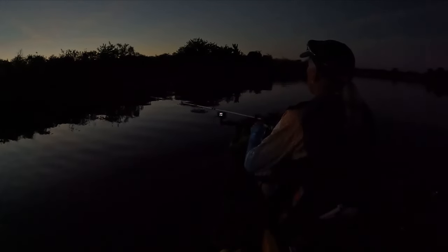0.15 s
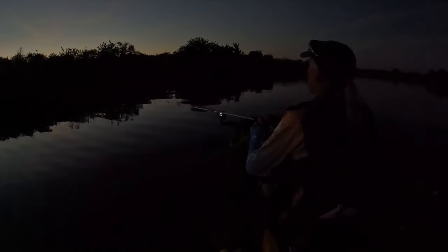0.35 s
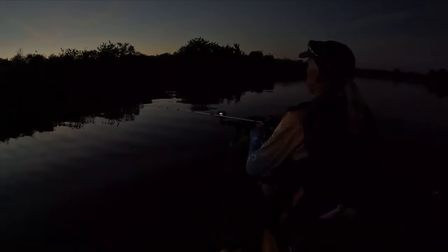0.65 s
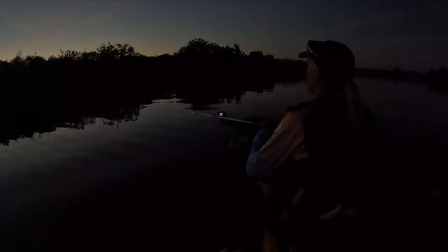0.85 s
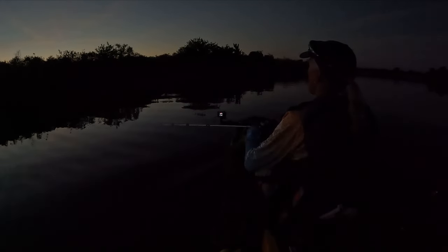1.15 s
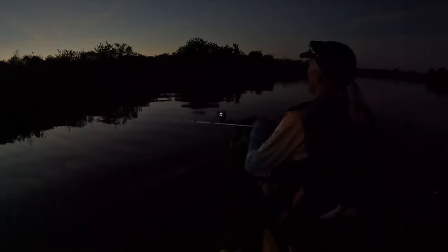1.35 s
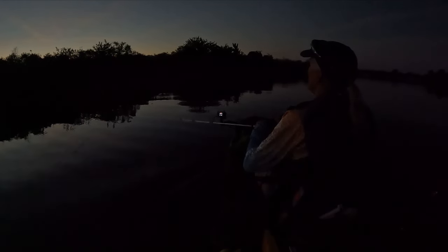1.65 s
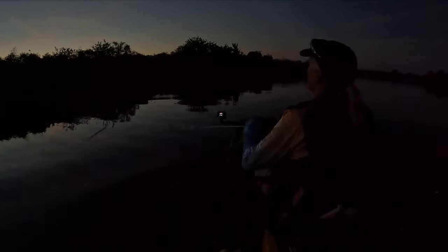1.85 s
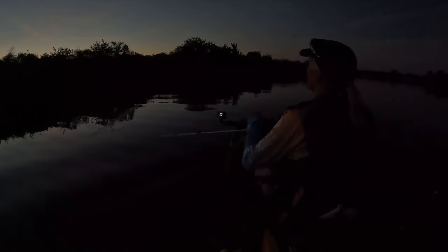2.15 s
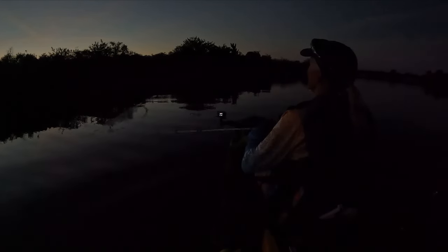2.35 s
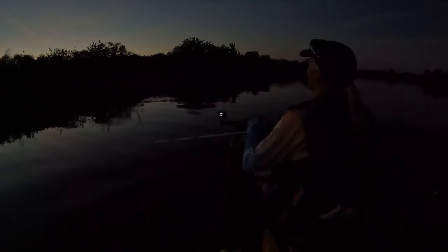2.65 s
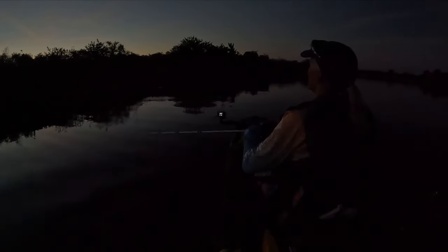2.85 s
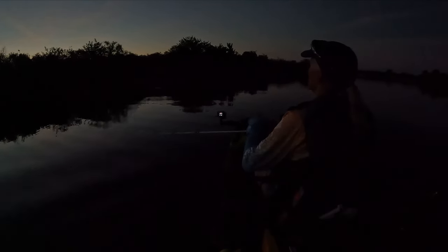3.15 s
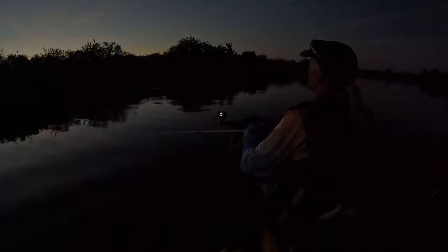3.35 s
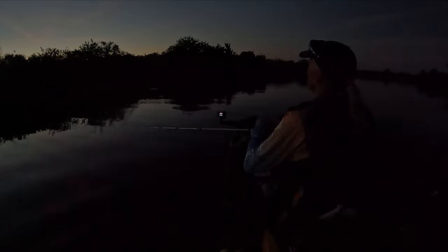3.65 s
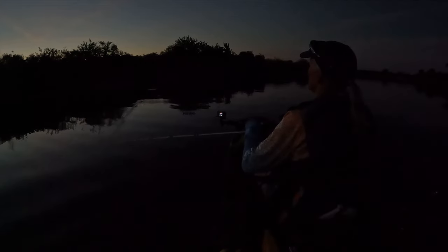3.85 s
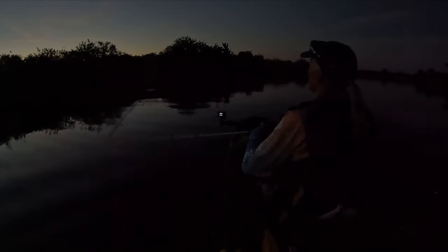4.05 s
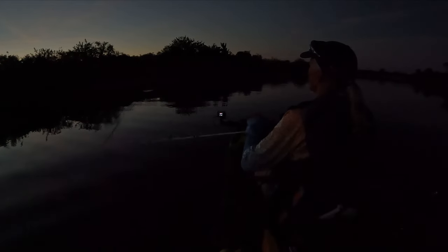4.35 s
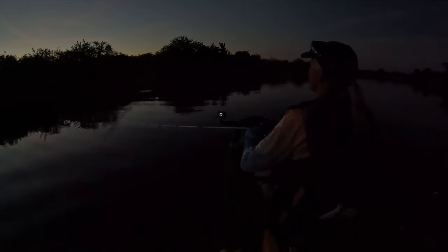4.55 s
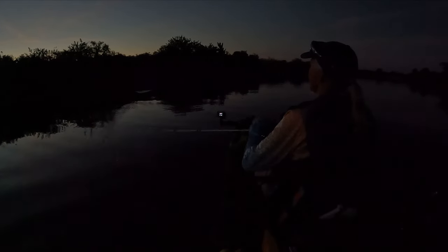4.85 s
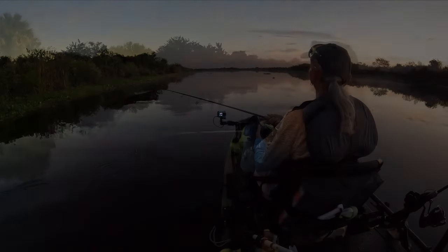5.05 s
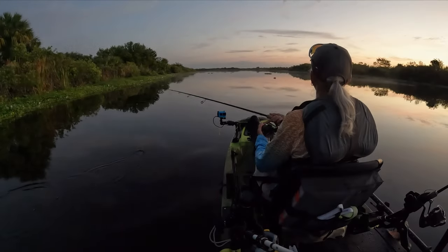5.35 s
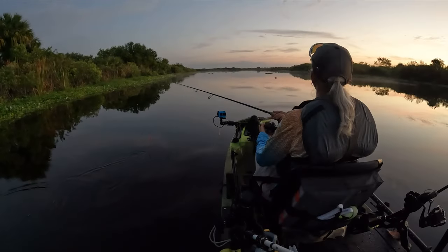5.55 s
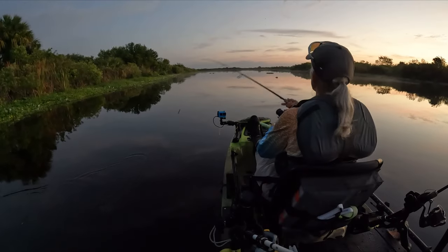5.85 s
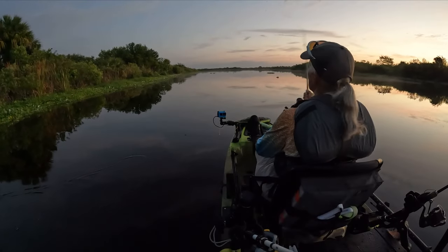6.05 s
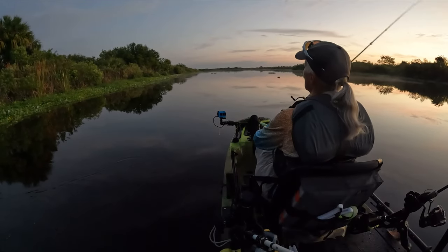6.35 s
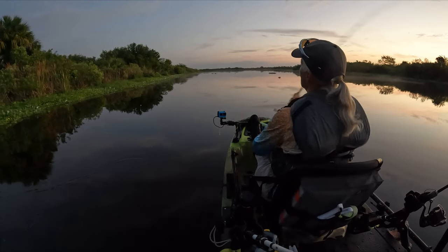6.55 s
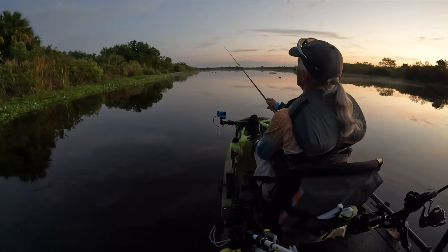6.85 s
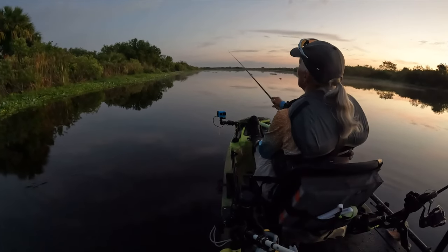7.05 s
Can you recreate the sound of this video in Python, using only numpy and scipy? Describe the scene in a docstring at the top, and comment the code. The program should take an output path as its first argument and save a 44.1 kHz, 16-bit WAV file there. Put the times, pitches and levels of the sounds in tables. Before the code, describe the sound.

A fishing reel rasps and ticks close by over quiet marsh birds, with gear knocking on a kayak, then a swishing cast.

```python
"""Casting from a kayak at dawn

Still marsh water: far birds and insects, a low hum, light wind on the microphone. Close by, an
angler cranks a reel that rasps and ticks, while tackle rattles and gear knocks on the plastic hull.
Near the end the bail snaps, the line is wound up, the rod swishes and line hisses off the spool.
Everything sits in the centre; only a faint hiss differs between left and right."""
import sys
import numpy as np
from scipy import signal
from scipy.fft import rfft, irfft
from scipy.io import wavfile
from scipy.ndimage import uniform_filter1d

SR = 44100
rng = np.random.default_rng(int(sys.argv[2]) if len(sys.argv) > 2 else 0)


def master_out(mix):
    """Clip the mix to full scale and print it as 16-bit PCM to the path in sys.argv[1]."""
    frames = np.transpose(np.atleast_2d(mix))
    ceiling = np.clip(frames, -1, 1)
    pcm = np.round(ceiling * 32767).astype(np.int16)
    wavfile.write(sys.argv[1], SR, pcm)


N = 317735
T = np.arange(N) / SR

# modes of the reel body: pitch_hz, width_hz, gain_db
REEL_MODES = [(850, 200, -2.5), (1563, 260, 21), (2183, 470, 9.5), (2920, 550, -35), (5330, 1040, -39),
              (9400, 1960, -18)]


def amp(db):
    """Decibels to amplitude."""
    return 10 ** (np.asarray(db) / 20)


def unit_rms(x):
    """Scales a signal to an RMS of 1."""
    return x / np.sqrt(np.mean(x ** 2) + 1e-20)


def add(mix, start_s, sound):
    """Mixes a sound in at its start time."""
    part = mix[round(start_s * SR):][:len(sound)]
    part += sound[:len(part)]


def follow(rows):
    """Columns of a timed curve at every sample, and a gate that closes within 10 ms outside it."""
    times, *columns = np.transpose(rows)
    gate = np.interp(T, [times[0] - .01, times[0], times[-1], times[-1] + .01], [0, 1, 1, 0])
    return [np.interp(T, times, column) for column in columns] + [gate]


def colour(x, points):
    """Shapes the spectrum along points of freq_hz, gain_db."""
    point_hz, db = np.transpose(points)
    hz = np.fft.rfftfreq(len(x), 1 / SR)
    gain = amp(np.interp(np.log(hz + 1), np.log(point_hz + 1), db))
    return irfft(rfft(x) * gain, len(x))


def flicker(per_s, db):
    """A factor that wanders at random around 1."""
    steps = np.arange(0, T[-1] + 1, 1 / per_s)
    return amp(db * np.interp(T, steps, rng.standard_normal(len(steps))))


def noise(points):
    """Noise of unit RMS, coloured along points of freq_hz, gain_db."""
    return unit_rms(colour(rng.standard_normal(N), points))


def resonate(x, hz, *widths_hz):
    """Resonances in series, one per width: each shifts hz down to zero, smooths and shifts back."""
    carrier = np.exp(2j * np.pi * np.cumsum(hz * np.ones(len(x))) / SR)
    for width in widths_hz:
        pole = np.exp(-np.pi * width / SR)
        x = 2 * (carrier * signal.lfilter([1 - pole], [1, -pole], x / carrier)).real
    return x


def noise_band(hz, *widths_hz):
    """Noise of unit RMS around a steady or moving pitch."""
    return unit_rms(resonate(rng.standard_normal(N), hz, *widths_hz))


def tone(hz):
    """A gliding sine of unit RMS."""
    return np.sqrt(2) * np.sin(2 * np.pi * np.cumsum(hz) / SR)


def marsh():
    """Still air over the water; far insect and bird choruses and a low hum as bands of noise."""
    # spectrum of the air: freq_hz, gain_db
    air_colour = [(60, -22), (100, 5.5), (130, -5.5), (200, -13.5), (450, -13.5), (700, -18.5), (1400, -14),
                  (2200, -11.5), (2800, -14.5), (3400, -19), (3900, -10.5), (5000, -15.5), (7000, -23),
                  (15000, -30), (16500, -27)]
    # choruses and hum: start_s, end_s, pitch_hz, width_hz, level_db
    drones = [(0, 8, 4200, 360, -69.5), (0.5, 9.5, 4240, 470, -70.5), (5.098, 6, 5600, 120, -75.5),
              (5.148, 8.1, 118, 30, -63), (2, 3.2, 314, 34, -76.5), (5.2, 9.4, 186, 32, -68),
              (1.3, 5.3, 2780, 940, -71)]
    out = amp(-62) * noise(air_colour) * flicker(3.75, 1)
    for start, end, hz, width, db in drones:
        fade = np.clip(np.minimum(T - start + .1, end - T) / .1, 0, 1)
        out += fade * amp(db) * noise_band(hz, width, width) * flicker(8, 1.6)
    return out


def side_hiss():
    """Faint steady hiss, opposite in left and right."""
    # spectrum of the hiss: freq_hz, gain_db
    hiss_colour = [(60, -12), (200, -3.5), (600, -1), (1200, -14), (3000, -19.5), (8000, -3), (12000, 0),
                   (16000, -8)]
    return amp(-83.5) * noise(hiss_colour) * flicker(25, 1.8)


def wind():
    """Light wind on the microphone: deep, lumpy gusts under a low rustle."""
    # strength of the breeze: time_s, gust_db, rustle_db
    breeze = [(0.0, -38, -48), (0.18, -42.5, -59), (0.5, -46, -53), (0.74, -45, -55.5), (0.96, -46, -65.5),
              (1.7, -47, -63), (2.55, -46, -64.5), (3.4, -50, -68), (4.9, -49.5, -66.5), (5.33, -55.5, -69),
              (5.5, -53, -62.5), (5.9, -53.5, -62.5), (6.05, -56, -68), (6.56, -49, -65.5),
              (6.62, -47, -34)]
    gust_db, rustle_db, gate = follow(breeze)
    gusts = noise([(2, 9.5), (12, 8.5), (45, 0), (70, -4), (130, -28), (400, -55)]) * flicker(9, 2.2)
    rustle = noise([(60, 2), (150, 2), (320, 1.5), (550, -6), (800, -15), (3000, -43)])
    return gate * (amp(gust_db) * gusts + amp(rustle_db) * rustle * flicker(30, 2.5))


def birds():
    """Gliding whistles, a little blurred by distance, with faint echoes from the far bank."""
    # bird notes: start_s, length_s, start_hz, end_hz, level_db
    notes = [(0.58, .03, 2350, 2300, -66), (0.685, .03, 750, 900, -65), (0.712, .045, 1050, 1200, -66),
             (0.77, .06, 760, 730, -58), (0.915, .022, 2300, 2400, -56), (1.045, .04, 2480, 2400, -67),
             (1.07, .04, 1300, 1350, -66), (1.21, .06, 740, 740, -65), (1.275, .07, 3440, 2840, -63),
             (1.36, .04, 2290, 2950, -67), (1.7, .055, 3380, 2780, -63), (2.15, .04, 3350, 2900, -66),
             (2.32, .03, 3250, 2800, -68), (2.37, .13, 1770, 3250, -65), (2.39, .045, 700, 870, -67),
             (2.43, .05, 880, 780, -67), (2.705, .075, 3710, 2500, -62), (2.765, .065, 1870, 2990, -59),
             (2.81, .07, 1600, 2350, -66), (2.86, .075, 2400, 3050, -67), (2.875, .08, 2390, 2400, -58),
             (2.945, .025, 2400, 2050, -63), (2.995, .045, 3750, 2500, -63), (3.0, .065, 550, 550, -64),
             (3.115, .08, 3680, 2500, -62), (3.135, .05, 2000, 2950, -61), (3.21, .04, 1780, 3180, -61),
             (3.25, .08, 2330, 3450, -69), (3.29, .075, 2350, 2420, -60), (3.345, .05, 3700, 2500, -61),
             (3.36, .02, 2300, 1900, -64), (3.49, .035, 2110, 2920, -59), (3.535, .085, 3640, 2580, -65),
             (3.54, .05, 2650, 2650, -66), (3.635, .04, 1800, 3120, -60), (3.695, .055, 3850, 2450, -62),
             (3.71, .08, 515, 520, -66), (3.72, .075, 2430, 2420, -61), (3.785, .02, 2420, 2150, -64),
             (3.845, .045, 2070, 2920, -61), (3.89, .055, 3220, 3170, -67), (3.99, .05, 2650, 2730, -69),
             (4.17, .04, 3110, 3240, -66), (4.075, .05, 560, 760, -68), (4.32, .085, 1750, 2800, -69),
             (4.34, .07, 1250, 1200, -66), (4.39, .04, 3560, 3330, -63), (4.4, .04, 2750, 2600, -69),
             (4.45, .05, 770, 800, -67), (4.81, .05, 3600, 3240, -68), (4.87, .03, 3250, 3000, -70),
             (4.895, .05, 3500, 2550, -66), (4.92, .06, 1220, 1260, -68), (5.03, .06, 3180, 3130, -62),
             (5.04, .05, 2430, 2440, -62), (5.362, .088, 2950, 2250, -56), (5.478, .028, 2720, 2900, -58),
             (5.514, .038, 2960, 2330, -51), (5.59, .08, 2320, 2310, -65), (5.85, .03, 2680, 2500, -63),
             (5.99, .07, 2000, 2100, -71), (6.115, .06, 4550, 3200, -65), (6.13, .045, 5300, 4100, -73)]
    glide_lag, warble_start_s, warble_depth_hz = .17, 5.362, 200
    out = np.zeros(N)
    for start, length, start_hz, end_hz, db in notes:
        t = T[:round(length * SR)]
        progress = t / length
        glide = progress - 4 * glide_lag * progress * (1 - progress)  # starts slowly
        hz = start_hz + (end_hz - start_hz) * glide
        if start == warble_start_s:
            hz += warble_depth_hz * np.sqrt(1 - progress) * np.cos(2 * np.pi * 62.5 * (t - .009))
        blur = unit_rms(resonate(rng.standard_normal(len(t)), hz, 71, 190))
        add(out, start, amp(db) * (1.12 * tone(hz) + .33 * blur) * signal.windows.tukey(len(t), .5))
    bank = rng.standard_normal(6000) * amp(-60 * T[:6000] / .21)
    echoes = signal.oaconvolve(out, bank / np.linalg.norm(bank))[:N]
    return out + amp(-11) * echoes


def tackle():
    """Loose tackle bumps in its boxes: a scratchy rattle of some milliseconds rings the hollows."""
    # bumps: start_s, level_db, ring_hz, treble_db, rattle_s
    bumps = [(0.044, -48.5, 1880, -18, 0.006), (0.073, -52.5, 870, 16.5, 0.016),
             (0.18, -61, 1300, 20, 0.0052), (0.284, -37.5, 1310, -41.5, 0.003),
             (0.246, -59, 600, -30, 0.0034), (0.289, -41, 673, -30, 0.005), (0.355, -66, 1500, 3, .003),
             (0.405, -56, 2830, -10, 0.0043), (0.417, -40.5, 1310, -7, 0.013), (0.421, -43, 850, 6, .015),
             (0.478, -52, 1510, 3, 0.0058), (0.565, -44.5, 1400, 4, 0.0046), (0.619, -37, 1290, -9, 0.0096),
             (0.796, -32.5, 1524, -0.5, 0.0087), (1.135, -39, 1960, -35, 0.0098),
             (6.687, -57.5, 870, 19, 0.0052), (7.076, -44, 1390, -11, 0.0033)]
    # hollows of a box: pitch_ratio, gain_db
    hollows = [(1.002, 3), (1.3, -9), (1.78, -17)]
    t, out = T[:3000], np.zeros(N)
    for start, db, hz, treble_db, rattle_s in bumps:
        scrape = rng.standard_normal(len(t)) * np.exp(-t / rattle_s) * (1 - np.exp(-t / .00055))
        rings = [(gain, resonate(scrape, k * hz, .054 * k * hz, 2.4 * k * hz)) for k, gain in hollows]
        treble = resonate(resonate(scrape, 4400, 2600), 1600, 4700) * np.exp(-t / .013)
        for gain, ring in rings + [(treble_db, treble)]:
            add(out, start, amp(db + gain) * ring / abs(ring).max())
    return out


def hull_knocks():
    """Dull blows of gear on the plastic hull; higher rings die sooner."""
    # blows: start_s, level_db, ring_hz, t60_s
    blows = [(0.015, -32.5, 168, 0.04), (0.047, -24.5, 212, 0.015), (0.078, -31.5, 190, 0.029),
             (0.123, -33, 186, 0.029), (0.272, -36, 258, 0.026), (0.281, -34, 243, 0.047),
             (0.295, -38.5, 150, 0.059), (0.32, -47, 216, 0.067), (1.139, -43, 236, 0.03),
             (1.956, -56, 319, 0.14), (2.026, -19, 178.5, 0.022), (2.133, -51, 500, 0.045),
             (5.504, -46.5, 403, 0.032), (6.603, -25.5, 237.3, 0.028), (6.698, -27.5, 102, 0.028),
             (6.711, -21.5, 407, 0.016), (7.066, -35, 266, 0.033), (7.074, -30.5, 204.3, 0.071),
             (7.082, -35, 223, 0.063), (7.119, -43, 130, 0.097)]
    # hull modes: pitch_ratio, gain_db
    modes = [(1, 11), (2.2, 4.5), (3.5, -9), (6.9, -9)]
    t, out = T[:8000], np.zeros(N)
    attack = 1 - np.exp(-t / .0041)
    for start, db, hz, t60 in blows:
        ring = sum(amp(gain - 60 * t * k ** .37 / t60) * np.sin(2 * np.pi * k * hz * t)
                   for k, gain in modes)
        add(out, start, -amp(db) * ring * attack)
    return out


def clothing():
    """Sleeves and vest rustle as the angler moves."""
    # movement: time_s, level_db
    movement = [(5.2, -96), (5.45, -65.5), (5.5, -75), (5.736, -55.5), (5.86, -58), (5.97, -68),
                (6.02, -96), (6.17, -89), (6.21, -62), (6.37, -60), (6.506, -74), (6.64, -78)]
    # spectrum of the cloth: freq_hz, gain_db
    cloth_colour = [(300, -11), (800, 3.5), (2000, 1), (4500, 0.5), (8000, -9), (15000, -24)]
    db, gate = follow(movement)
    return gate * amp(db) * noise(cloth_colour) * flicker(55, 1.4)


def seat_shake():
    """The swing shakes rod and seat: a very deep heave and a rough rumble."""
    # shaking: time_s, heave_db, rumble_db
    shaking = [(6.55, -66, -65), (6.595, -54, -82), (6.61, -38, -49), (6.655, -23, -38), (6.71, -31, -42),
               (6.73, -36, -42.5), (6.79, -40, -38.5), (6.84, -25.5, -39), (6.865, -41, -39),
               (6.89, -30, -53.5), (7.05, -70, -53.5), (7.09, -43, -52), (7.2, -49, -65)]
    # spectrum of the rumble: freq_hz, gain_db
    rumble_colour = [(59, -13), (100, -1), (295, 2), (420, 1), (678, 1.5), (982, -8.5), (1080, -7.5),
                     (3590, -21.5), (4000, -17), (5200, -19.5), (8800, -120)]
    heave_db, rumble_db, gate = follow(shaking)
    heave = noise([(3, -9), (12, 12.5), (30, 0), (70, -12.5), (120, -25), (300, -59)])
    rumble = noise(rumble_colour) * flicker(70, 2.6)
    return gate * (amp(heave_db) * heave + amp(rumble_db) * rumble)


def rod_swish():
    """The rod cuts the air with a broad swish, and its thin tip whistles."""
    # swish: time_s, level_db, pitch_hz
    swish_curve = [(6.72, -64, 2600), (6.76, -54, 2000), (6.785, -42, 2300), (6.79, -34, 2500),
                   (6.803, -34.5, 2850), (6.808, -49, 3300), (6.865, -55, 3000), (6.885, -51, 3300)]
    # whistle of the tip: time_s, pitch_hz, level_db
    whistle_curve = [(6.77, 1500, -56), (6.786, 2500, -46), (6.792, 3100, -43), (6.803, 4900, -42),
                     (6.808, 5400, -52), (6.83, 5900, -51), (6.85, 4900, -52), (6.87, 4200, -53),
                     (6.885, 3900, -62)]
    db, hz, gate = follow(swish_curve)
    swish = gate * amp(db) * noise_band(hz, 2400, 4000) * flicker(100, 3)
    hz, db, gate = follow(whistle_curve)
    return swish + gate * amp(db) * noise_band(hz, 380, 800)


def line_run():
    """Line hisses through the guides; its coils slap the first guide fast enough to hum."""
    # running line: time_s, hiss_db, hiss_hz, fizz_db
    running = [(6.72, -71, 9400, -79), (6.78, -56, 10000, -53), (6.82, -52, 10000, -46),
               (6.88, -49, 10900, -55), (6.898, -48.5, 11300, -53), (6.99, -44.5, 11800, -65),
               (7.08, -48, 10900, -64), (7.2, -49.5, 9900, -67)]
    # slapping coils: time_s, pitch_hz, level_db
    coils = [(6.86, 159.8, -53), (6.92, 174, -52), (6.964, 180.6, -51), (7.0, 193, -45), (7.01, 189, -58),
             (7.06, 146, -47)]
    hiss_db, hiss_hz, fizz_db, gate = follow(running)
    fizz = noise([(5000, -20), (7000, -8), (13000, -7), (14500, -14), (16000, -12), (17000, -49)])
    hiss = noise_band(hiss_hz, 2800, 5700)
    hiss = unit_rms(colour(hiss, [(5000, 1.5), (7300, -8), (8000, -1), (13500, -3), (16000, -7)]))
    line = gate * (amp(fizz_db) * fizz * flicker(71, 1.3) + amp(hiss_db) * hiss * flicker(130, .75))
    coil_hz, coil_db, gate = follow(coils)
    return line + gate * amp(coil_db) * tone(coil_hz)


def bail_snap():
    """The wire snaps over, chatters for two milliseconds, rings weakly and leaves an airy tail."""
    # modes of the wire: pitch_hz, gain_db, t60_s
    modes = [(4830, -5, 0.048), (3130, -16, 0.0068), (6200, -5.5, 0.0064), (8090, 6, 0.003),
             (10600, 8, 0.0025), (13500, -11, 0.0054)]
    t, out = T[:3000], np.zeros(N)
    ring = sum(amp(db - 60 * t / t60) * np.sin(2 * np.pi * hz * t) for hz, db, t60 in modes)
    chatter = np.interp(t, [0, .0003, .002, .0028, .0036, .008, .0095], [0, 1.1, 2.5, 2, -1.2, .54, .5])
    tail = resonate(rng.standard_normal(len(t)), 6600, 3600) * amp(-18 - 60 * t / .1)
    add(out, start_s=5.839, sound=amp(-18) * (ring * chatter + tail))
    return out


def wind_up():
    """Gear whine of the wind-up: fuzzy overtones that come and go inside the whirr of the line."""
    # winding: time_s, mesh_hz, mesh_db, whirr_db
    winding = [(6.2, 658, -64, -64), (6.24, 644, -63, -65), (6.27, 712, -56.5, -59.5),
               (6.37, 803, -55, -53.5), (6.41, 808, -54, -57), (6.44, 822, -51.5, -62),
               (6.538, 745, -57, -57.5), (6.59, 700, -55, -62.5), (6.686, 700, -61, -62),
               (6.75, 704, -68, -53)]
    # gear whine of the wind-up: harmonic, gain_db
    overtones = [(2, -8), (3, -3), (4, -4), (5, 0), (6, 1), (7, -7), (8, -9), (9, -19), (11, -19)]
    hz, mesh_db, whirr_db, gate = follow(winding)
    phase = 2 * np.pi * np.cumsum(hz * flicker(150, .04)) / SR
    mesh = np.zeros(N)
    for k, db in overtones:
        fuzz = noise_band(k * hz, 20 * k, 40 * k)
        mesh += amp(db) * flicker(30, 3) * (np.cos(k * phase) + .85 * fuzz)
    whirr = noise([(800, -18), (2000, -1), (5800, 0), (6800, -7.5), (10000, -15.5), (16000, -32)])
    return gate * (amp(mesh_db) * unit_rms(mesh) + amp(whirr_db) * whirr * flicker(60, 1.6))


def handle_levels():
    """Effort, grit and spool cup levels in dB: each push swells, holds and fades; neighbours overlap."""
    # pushes on the reel handle: time_s, hold_s, effort_db, grit_db, cup_db
    pushes = [(0.0, 0.15, -70, -62.5, -91), (0.288, 0.0058, -57, -89, -88),
              (0.433, 0.016, -61.5, -62.5, -80), (0.573, 0.0083, -62.5, -65, -81),
              (0.636, 0.011, -62.5, -76, -82), (0.825, 0.0096, -61.5, -61, -83),
              (0.894, 0.1, -56, -62, -81), (1.132, 0.12, -58, -65, -87), (1.347, 0.072, -56, -60, -84),
              (1.534, 0.073, -51.5, -56.5, -82), (1.706, 0.095, -51.5, -58.5, -81),
              (1.885, 0.083, -51, -59, -80), (2.052, 0.11, -51.5, -55.5, -85),
              (2.216, 0.034, -53, -58, -62), (2.41, 0.012, -54, -62, -79), (2.488, .01, -53.5, -60.5, -60),
              (2.657, 0.0096, -55, -56, -80), (2.756, 0.05, -54, -60.5, -62),
              (3.006, 0.015, -50.5, -63, -77), (3.046, 0.025, -47.5, -56.5, -59),
              (3.292, 0.066, -56, -60.5, -64.5), (3.539, 0.067, -50.5, -61, -66),
              (3.73, 0.044, -61, -78, -72.5), (3.872, 0.06, -55.5, -63, -69),
              (4.09, 0.13, -56, -62.5, -71.5), (4.485, 0.026, -51.5, -60, -64),
              (4.708, 0.071, -55.5, -60.5, -69.5), (5.029, 0.026, -49.5, -57, -63),
              (5.156, 0.012, -66.5, -75, -71)]
    rise_db_per_s, fall_db_per_s = 258.5, 330.5
    start, hold, *levels_db = np.transpose(pushes)[:, :, None]
    t = T[::100]
    shape_db = -rise_db_per_s * np.maximum(start - t, 0) - fall_db_per_s * np.maximum(t - start - hold, 0)
    totals = [np.linalg.norm(amp(db + shape_db), axis=0) for db in levels_db]  # pushes add in power
    return [np.interp(T, t, 20 * np.log10(total + 1e-6)) for total in totals]


def crackle(effort_db):
    """Tiny dry clicks of line and handle, about ten a second, louder with effort."""
    sizes = amp(5 * np.minimum(rng.exponential(1, N), 2))
    clicks = sizes * (rng.random(N) < 10 / SR)
    return amp(-41 + .25 * (effort_db + 58)) * resonate(resonate(clicks, 5800, 3200), 6000, 6900)


def crank(effort_db, grit_db, cup_db):
    """Uneven slips ring the reel body and spool cup under dry grit; gears whine higher on each push."""
    # upper modes of the spool cup: pitch_hz, width_hz, gain_db
    cup_modes = [(3101, 160, 0.5), (5250, 190, -2.5), (9584, 600, -18)]
    # gear whine of the handle pushes: harmonic, gain_db
    overtones = [(1, -8.5), (2, 6), (3, -3.5), (4, -12)]
    # spectrum of the grit: freq_hz, gain_db
    grit_colour = [(120, -47), (300, 4.5), (1000, 1.5), (2000, -43), (3200, 5), (4600, 6.5), (5900, 0),
                   (8500, -4), (9500, -7), (10500, -8.5), (16000, -22)]
    slips = rng.standard_normal(N) * flicker(90, 3) * flicker(350, 2)
    # the rings drift in pitch and rise with effort
    drift = flicker(14, .45) * (1 + .005 * (np.maximum(effort_db, -70) + 53))
    body = sum(amp(db) * unit_rms(resonate(slips, hz * drift, width, 9 * width))
               for hz, width, db in REEL_MODES)
    cup = sum(amp(db) * unit_rms(resonate(slips, hz * drift, width, 2 * width))
              for hz, width, db in cup_modes)
    mesh_hz = 770 + 4.8 * (uniform_filter1d(effort_db, 2000) + 55.5)
    phase = 2 * np.pi * np.cumsum(mesh_hz * flicker(120, .2)) / SR
    whine = sum(amp(db) * flicker(60, 3.5) * np.cos(k * phase) for k, db in overtones)
    rasp = unit_rms(body) + amp(-5) * unit_rms(whine)
    grit = unit_rms(colour(slips, grit_colour))
    return amp(effort_db) * rasp + amp(cup_db) * cup + amp(grit_db) * grit


def reel_ticks():
    """Each tick is a sharp blow and short rattle that ring the reel body, most near a favoured pitch."""
    # clear ticks: start_s, level_db, pitch_hz, treble_db
    clear = [(0.141, -48, 5300, 3), (0.295, -66, 9400, -3), (0.7934, -23, 2420, -3),
             (0.8689, -26, 2100, -9), (0.902, -33.5, 1987, -6), (0.963, -40, 2830, 1.5),
             (0.989, -51, 1586, 9), (1.028, -42, 1220, -16), (1.1116, -35.5, 1840, -22),
             (1.135, -33, 2183, -25), (1.176, -50, 2183, -25), (1.295, -45, 5200, 4),
             (1.325, -41, 1564, -6), (1.3923, -45, 1555, 5), (1.412, -54, 9400, 3), (1.418, -43, 1565, -9),
             (1.452, -37.5, 1830, 2), (1.466, -40, 1555, -3.5), (1.514, -43, 2183, 0),
             (1.5209, -31.5, 1643, -3), (1.5922, -39, 1565, -20), (1.629, -48, 5300, 0),
             (1.6316, -33.5, 1860, -8), (1.643, -33, 1830, -5.5), (1.6988, -33.5, 1500, 0),
             (1.752, -37, 1564, -10), (1.788, -27.5, 1900, -4), (1.795, -29, 1900, -10),
             (1.825, -39, 2183, -21), (1.845, -54, 5300, 0), (1.853, -32, 1780, -2.5),
             (1.874, -29.5, 2350, -9), (1.9614, -29.5, 1964, -1.5), (1.97, -30.5, 1884, -6),
             (2.0311, -27, 1545, -2.5), (2.067, -33.5, 1532, -26), (2.128, -34.5, 2183, -10),
             (2.1321, -27.5, 1720, -6), (2.141, -34.5, 1600, -4), (2.182, -35, 2370, -17),
             (2.195, -44, 1700, 4), (2.2006, -30, 1728, -3), (2.227, -26, 2463, -10), (2.236, -44, 2183, 0),
             (2.293, -51, 5220, -3), (2.351, -42, 2360, -13), (2.4694, -43, 1980, -4),
             (2.62, -41.5, 2480, -11), (2.656, -39, 1297, -16), (2.67, -38, 1200, -11),
             (2.696, -44, 2294, -20), (2.707, -48, 5270, 0), (2.7164, -33.5, 1690, -9),
             (2.755, -48, 2330, -13), (2.87, -34, 5170, -18), (3.007, -33.5, 1560, -20),
             (3.0518, -34, 1580, -25), (3.116, -43, 2100, -22), (3.14, -46.5, 5210, -2),
             (3.155, -45, 1380, -8), (3.205, -35.5, 2030, -16), (3.2242, -41.5, 2183, -9),
             (3.252, -46, 1500, -11), (3.3227, -37.5, 1853, -15), (3.406, -32, 5220, -26),
             (3.486, -35, 1870, -7), (3.5234, -22.5, 1634, -7.5), (3.6272, -36, 2515, -10),
             (3.681, -43, 5220, -6), (3.957, -47, 5180, 1), (3.96, -48.5, 1647, -17.5),
             (4.095, -52, 1560, -20), (4.2049, -38, 2043, -11.5), (4.248, -43, 5160, -13),
             (4.3579, -42.5, 1700, 1.5), (4.49, -53, 1570, -16.5), (4.5423, -36.5, 4830, -15),
             (4.6, -38.5, 1840, -10), (4.648, -45.5, 1560, 4), (4.675, -43, 1604, -3),
             (4.716, -49, 2308, -4), (4.7642, -34.5, 1790, -18), (4.7816, -37, 2180, -16),
             (4.8197, -32, 5200, -12), (4.846, -48.5, 5260, 0.5), (5.094, -40.5, 5130, -9),
             (5.1596, -42.5, 1766, -21), (6.612, -56, 5300, 5), (6.655, -54, 5220, 3)]
    # how the treble of a blow reaches each reel mode: gain_db
    treble_reach = [-15.5, -30, -19, -64, -5.5, -7.5]
    off_pitch_db_per_octave, rattle_s, snap_s = 31.5, .0021, .0003
    # a dozen faint ticks fall at random
    faint = [(rng.uniform(.9, 5.2), -55, rng.uniform(1400, 2500), -5) for _ in range(12)]
    t, out = T[:900], np.zeros(N)
    for start, db, pitch_hz, treble_db in clear + faint:
        grain = rng.standard_normal(len(t))
        blow = np.sign(grain) * np.exp(-t / rattle_s) * (grain ** 2 + 3 * np.exp(-t / .00018))
        for (hz, width, _), reach_db in zip(REEL_MODES, treble_reach):
            ring = resonate(blow, hz, 1.01 * width, 2 * width)
            octaves_off = abs(np.log2(hz / pitch_hz))
            strength = amp(-off_pitch_db_per_octave * octaves_off) + amp(treble_db + reach_db)
            add(out, start, amp(db) * strength * ring / abs(ring).max())
        snap = np.gradient(grain) * np.exp(-t / snap_s)
        add(out, start, amp(db + treble_db - 4) * snap)
    return out


def scene():
    """Far marsh, boat, reel and cast in the centre, with a faint hiss to the sides."""
    effort_db, grit_db, cup_db = handle_levels()
    background = marsh() + wind() + birds()
    boat = tackle() + hull_knocks()
    reel = crank(effort_db, grit_db, cup_db) + crackle(effort_db) + reel_ticks() + bail_snap() + wind_up()
    cast = clothing() + seat_shake() + rod_swish() + line_run()
    mid, side = background + boat + reel + cast, side_hiss()
    return np.array([mid + side, mid - side])


def record(dry):
    """The microphone chain cuts the highest treble and adds a small steady offset."""
    cutoff_hz, offset = 15850, -.001
    lowpass = signal.firwin(511, cutoff_hz, window=("kaiser", 9), fs=SR)
    return offset + signal.oaconvolve(dry, lowpass[None], "same")


dry = scene()
out = record(dry)
master_out(out)
```